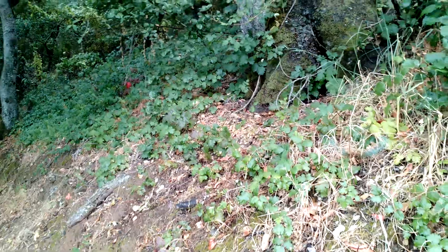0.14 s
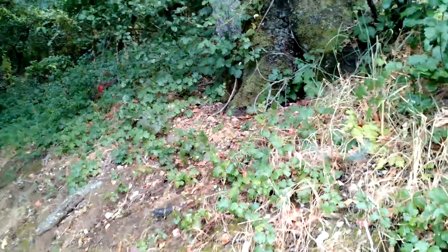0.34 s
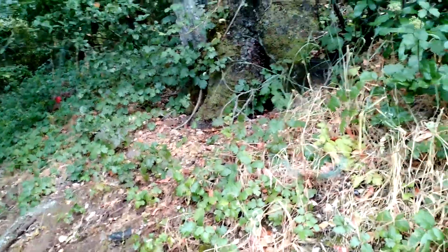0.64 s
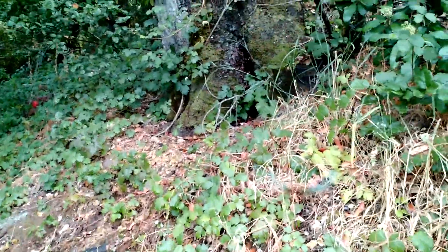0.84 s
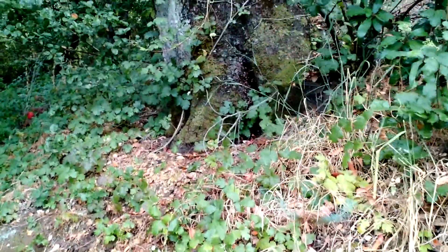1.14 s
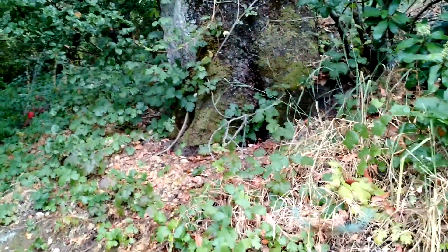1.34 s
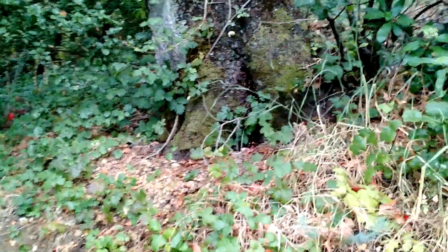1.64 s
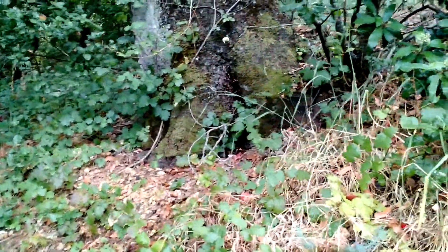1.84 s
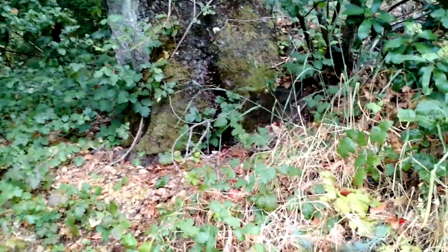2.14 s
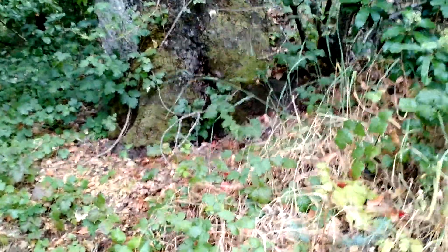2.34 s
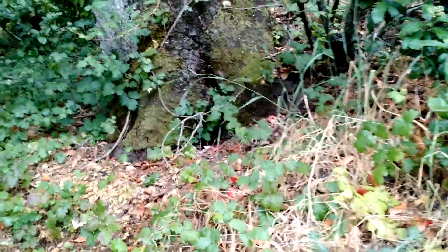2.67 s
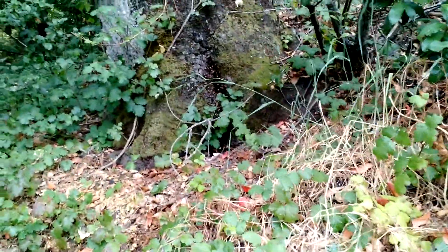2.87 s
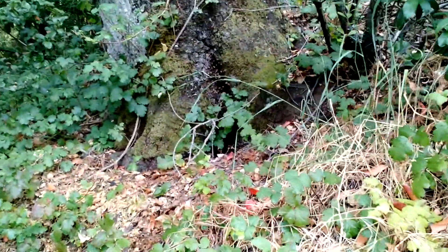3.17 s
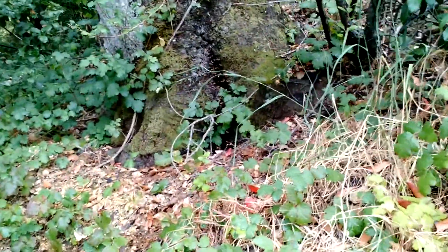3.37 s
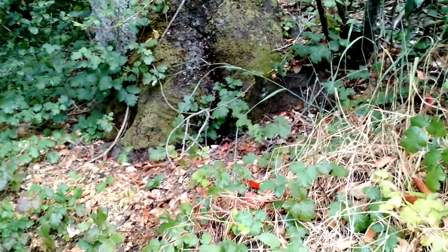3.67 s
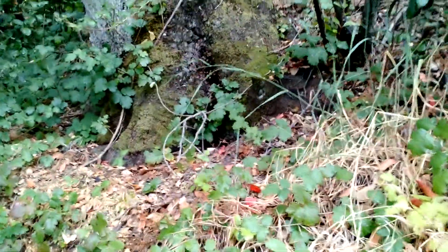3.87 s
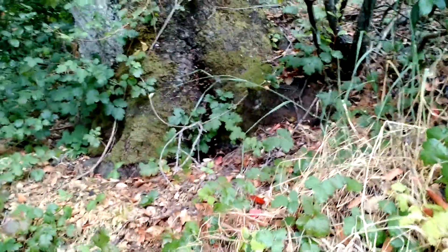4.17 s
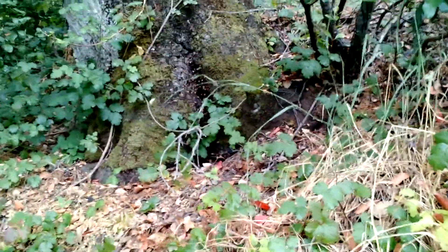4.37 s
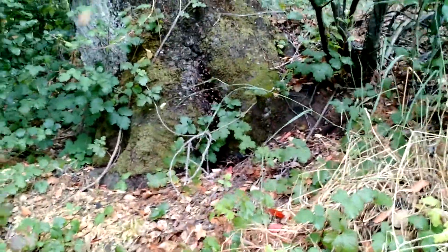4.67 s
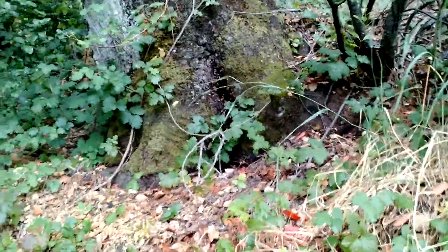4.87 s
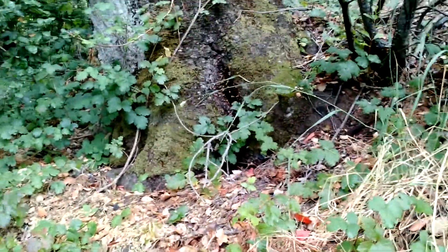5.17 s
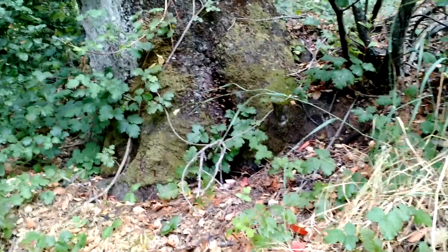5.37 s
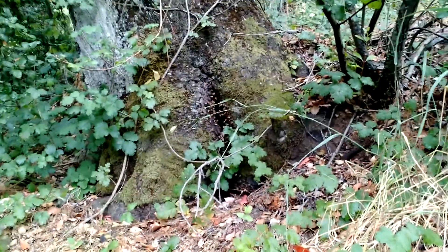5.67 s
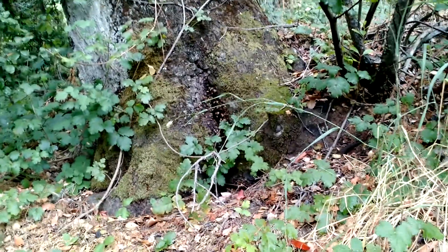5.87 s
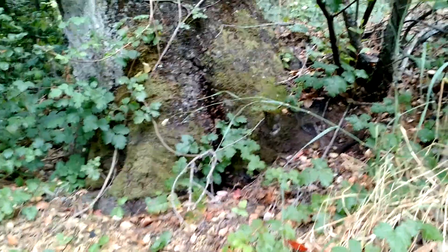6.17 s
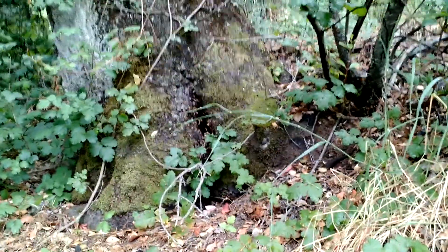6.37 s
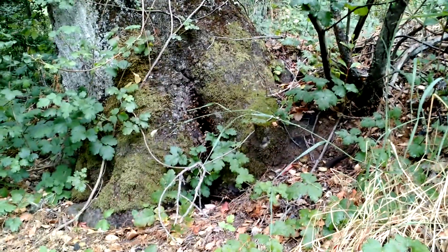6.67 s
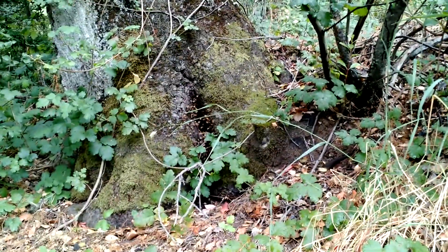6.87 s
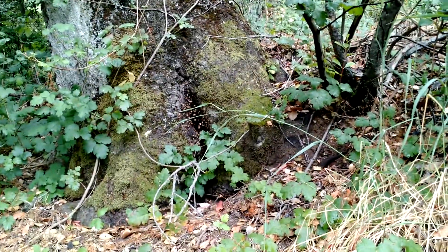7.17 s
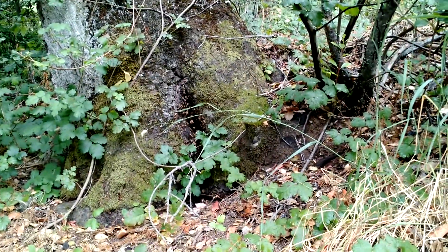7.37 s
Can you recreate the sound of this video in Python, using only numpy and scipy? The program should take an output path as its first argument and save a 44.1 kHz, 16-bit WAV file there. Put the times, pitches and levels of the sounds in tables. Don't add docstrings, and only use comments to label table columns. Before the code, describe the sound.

Quiet outdoor stereo ambience, close handheld microphone: a steady swarm buzz, leaf hiss, gentle wind buffeting and far low rumble. A low mechanical hum ends early, and scattered dry twig ticks follow. Past the middle, quick wing beats flutter nearby on the left, brush crackles and rustles sharply, and a bird gives a rough cry followed by a rapid trill. The brush settles and the bees buzz on.

```python
import sys
import numpy as np
from scipy import signal
from scipy.fft import rfft, irfft, next_fast_len
from scipy.io import wavfile
from scipy.ndimage import uniform_filter1d, map_coordinates

SR = 44100
rng = np.random.default_rng(int(sys.argv[2]) if len(sys.argv) > 2 else 0)


def wrap_up_sound(samples):
    columns = np.atleast_2d(samples).T
    tamed = np.clip(columns, -1, 1)
    steps = np.round(tamed * 32767).astype(np.int16)
    wavfile.write(sys.argv[1], SR, steps)


def convert_level_to_amplitude(level_db):
    exponent = np.asarray(level_db, float) / 20
    return 10 ** exponent


N = 331191
T = np.arange(N) / SR

# f/Hz, level/dB per Hz
WIND_SPECTRUM = [(2, -8), (7, 0), (13, -2), (22, -8), (34, -15), (50, -23), (90, -31), (200, -44),
                 (500, -62)]
# t/s, rise/dB, half length/s
GUSTS = [
    (0, 4, .6),
    (2, 2, .5),
    (3.7, 5, .45),
    (5.5, 5.5, .6),
    (7.5, -5, .5),
]
# f/Hz, level/dB per Hz
RUMBLE_SPECTRUM = [(22, -3), (40, -3.5), (65, 2.5), (100, -4.5), (130, -13), (300, -17.5), (700, -46)]
# f/Hz, likeness of the ports
RUMBLE_LIKENESS = [(40, .985), (200, .985)]
# t/s, rise/dB, half length/s
RUMBLE_SWELLS = [
    (.3, 5, 0.52),
    (3.6, 2.5, .25),
    (4.75, 2.5, .35),
    (5.45, 4, .15),
    (6.35, 5, 0.56),
]
# f/Hz, level/dB per Hz
LEAF_SPECTRUM = [(120, 19), (330, 8.5), (620, 4), (1100, 10), (1500, 4), (2200, 3), (3000, 3.5),
                 (5000, 3.5), (8000, 0.5), (12000, -2.5), (15500, -8.5)]
# f/Hz, left minus right/dB
LEAF_LEAN = [(100, -8), (1000, -1), (3000, -3.5), (6000, -5), (10000, -6), (15000, -7)]
# f/Hz, likeness of the ports
PORT_LIKENESS = [(60, 0.99), (250, 1), (600, 0.56), (1500, 0.4), (2500, .3), (5000, 0.05), (12000, 0.017)]
# peak t/s, rise/dB, build/s, settle/s
BRUSH_SWAY = (5.82, 6.2, 0.24, 0.31)
# t/s, level/dB, f/Hz, thud/dB, half of left minus right/dB
TWIG_TICKS = [
    (1.946, -44.5, 4330, -18, 0),
    (3.7992, -37, 6600, -20, -5),
    (3.904, -44, 6000, -3, 1),
    (4.066, -45, 3180, -12, 4),
    (5.3177, -36.5, 5600, -14, 5),
    (5.603, -44, 3430, -7, 3),
    (5.8485, -29, 3650, -8, 3),
    (7.4964, -48, 3680, -5, -2),
]
# t/s, level/dB, half length/s, low minus high feathers/dB
WING_BEATS = [
    (3.9, -56, .04, 4),
    (5.645, -52, .015, -12),
    (5.271, -52.5, 0.015, 11),
    (5.298, -42.5, .01, 6.5),
    (5.397, -42, .011, -7),
    (5.492, -50.5, 0.019, -3),
    (5.602, -53, 0.0043, -11),
    (6.079, -49.5, 0.027, -8),
]
# f/Hz, level/dB per Hz
LOW_FEATHER_SPECTRUM = [(200, -10), (600, -6.5), (1350, 1), (1800, -3.5), (2300, -15), (4000, -11),
                        (9000, -7), (15500, -36)]
# f/Hz, level/dB per Hz
HIGH_FEATHER_SPECTRUM = [(1500, -48), (2600, -7), (3200, 2), (3900, -5), (7000, -8), (10000, -11.5),
                         (15500, -24)]
# f/Hz, left minus right/dB
BIRD_LEAN = [(300, 38), (2500, 17), (3800, 12), (5000, 6), (9000, 4), (15000, 2)]
# start t/s, stop t/s, low level/dB, high minus low/dB
LAST_SHAKE = (6.058, 6.104, -42.5, -2.5)
# multiple of wing rate, level/dB
WING_HARMONICS = [(1, 0.5), (2, 0.5), (3, -10.5), (4, -19.5), (5, -14.5), (6, -18)]
# t/s, level/dB
SWARM_LEVEL = [(0, -57), (.2, -51), (.75, -55.5), (2.6, -54.5), (3.0, -53), (3.6, -54), (4.06, -50.5),
               (4.4, -54), (4.75, -50), (5.2, -53), (5.95, -49.5), (6.6, -54), (7.15, -51), (7.51, -53.5)]
# t/s, half length/s, f/Hz, glide/Hz per s, level/dB
BEE_PASSES = [(.12, .07, 95, 60, -52), (.38, .14, 101, -10, -52), (.38, .08, 263, -0.5, -55),
              (.72, 0.077, 267.4, -60, -57), (.95, 0.049, 260, 0, -58.5), (1.1, 0.062, 267, 0.5, -57.5),
              (3.73, .04, 238, 0, -55.5), (3.87, .04, 236, 0, -55), (3.96, .06, 260, 0, -54),
              (4.22, .14, 247, 55, -56), (4.43, 0.051, 242.2, -2, -56.5), (4.8, .05, 245, 0, -58),
              (5.98, .06, 261.8, 60.5, -54), (6.17, .06, 252, -19, -52.5), (6.32, 0.048, 245.5, 0, -56),
              (6.5, .06, 254.8, 30.5, -56), (7.25, .1, 238, 0, -58)]
# f/Hz, share crossed over
CROSS_SHARE = [(20, 0.73), (150, 0.8), (1300, 0.96), (2650, 0.76), (4000, 0.31), (5500, 0.39), (8500, 0.24),
               (15000, 0.18)]


def unit(x):
    return x / np.sqrt(np.mean(x ** 2) + 1e-20)


def along(points, hz):
    f, v = np.transpose(points)
    return np.interp(np.log(hz + 1), np.log(f + 1), v)


def wobble(rate_hz, count=1, step=1):
    at = np.arange(0, N, step) * rate_hz / SR
    knots = rng.standard_normal((count, 200))
    return np.array([map_coordinates(k, [at], mode="wrap") for k in knots])


def swells(rows):
    return sum(db * np.exp(-.5 * ((T - s) / half) ** 2) for s, db, half in rows)


def between(start_s, stop_s, fade_s=.012):
    return np.clip(np.minimum(T - start_s, stop_s - T) / fade_s, 0, 1)


def filtered(x, response):
    m = next_fast_len(N + 8192)
    return irfft(rfft(x, m) * response(np.fft.rfftfreq(m, 1 / SR)), m)[..., :N]


def rush(spectrum, lean, alike=PORT_LIKENESS):
    m = next_fast_len(N + 8192)
    hz = np.fft.rfftfreq(m, 1 / SR)
    turn = np.arccos(np.clip(along(alike, hz), 0, 1)) / 2
    noise = rfft(rng.standard_normal((2, N)), m) * convert_level_to_amplitude(along(spectrum, hz))
    mid, side = noise * [np.cos(turn), np.sin(turn)]
    lean_gain = convert_level_to_amplitude(np.outer([.5, -.5], along(lean, hz)))
    return unit(irfft([mid + side, mid - side] * lean_gain, m)[:, :N])


def wind():
    level_db = -46.5 + swells(GUSTS) + 2.2 * wobble(6, count=2)
    return convert_level_to_amplitude(level_db) * rush(WIND_SPECTRUM, [(30, .8)], alike=[(30, .1)])


def far_rumble():
    level_db = -45 + swells(RUMBLE_SWELLS) + 0.71 * wobble(3.01)
    return convert_level_to_amplitude(level_db) * rush(RUMBLE_SPECTRUM, [(40, 1.4), (200, 3.0)], alike=RUMBLE_LIKENESS)


def leaf_hiss(swarm_db):
    gain_db_per_s, follow_share = 0.2962, 0.18
    peak_s, rise_db, build_s, settle_s = BRUSH_SWAY
    sway_db = rise_db * np.exp(-np.abs(T - peak_s) / np.where(T < peak_s, build_s, settle_s))
    level_db = -50.5 + gain_db_per_s * T + follow_share * (swarm_db - swarm_db.mean()) + sway_db
    return convert_level_to_amplitude(level_db + 0.78 * wobble(20.98)) * rush(LEAF_SPECTRUM, LEAF_LEAN)


def lens_motor():
    early_db, ease_s, stop_s, motor_hz = 2.3, .55, 1.385, 46.87
    level_db = -43.8 + early_db * np.clip((ease_s - T) / .2 + .5, 0, 1)
    shake = np.sqrt(2) * np.sin(2 * np.pi * motor_hz * T)
    return between(0, stop_s) * convert_level_to_amplitude(level_db) * shake * np.array([[1.99], [-0.01]])


def twigs():
    out = np.zeros((2, N + SR))
    t = np.arange(SR // 40) / SR
    attack_s, decay_60db_s = .0012, .011
    fall = convert_level_to_amplitude(-60 * t / decay_60db_s) * (1 - np.exp(-t / attack_s)) ** 2 * 3
    for s, db, hz, thud_db, pan_db in TWIG_TICKS:
        grit = rng.standard_normal((3, len(t)))
        crack = np.cos(2 * np.pi * hz * t) * uniform_filter1d(grit[:2], size=8) * 2.95
        thud = convert_level_to_amplitude(thud_db + 11) * uniform_filter1d(grit[2], size=20)
        gain = convert_level_to_amplitude(db + 6.5 + np.array([[pan_db], [-pan_db]]))
        start = round((s - attack_s) * SR)
        out[:, start:start + len(t)] += gain * fall * (crack + thud)
    return out[:, :N]


def feathers():
    peak_s, rise_db_per_s, fall_db_per_s = 5.858, 79, 47
    rustle_grit_db, beat_grit_db = 1.5, 2.5
    slope = np.where(T < peak_s, rise_db_per_s, fall_db_per_s)
    rustle = between(5.66, 6.06, 0.047) * convert_level_to_amplitude(-39 - slope * np.abs(T - peak_s))
    start_s, stop_s, shake_db, shake_high_db = LAST_SHAKE
    shake = between(start_s, stop_s) * convert_level_to_amplitude(shake_db)
    low_db = 1.0 + 1.9 * wobble(25) + rustle_grit_db * wobble(180)
    high_db = 1.0 * wobble(24) + rustle_grit_db * wobble(300)
    low = shake + rustle * convert_level_to_amplitude(low_db)
    high = shake * convert_level_to_amplitude(shake_high_db) + rustle * convert_level_to_amplitude(high_db)
    grain = convert_level_to_amplitude(beat_grit_db * wobble(250)[0])
    for s, db, half_s, tilt_db in WING_BEATS:
        puff = convert_level_to_amplitude(db) * grain * np.exp(-.5 * ((T - s) / half_s) ** 2)
        low = low + puff * convert_level_to_amplitude(tilt_db / 2)
        high = high + puff * convert_level_to_amplitude(-tilt_db / 2)
    close = [(300, 0.93), (2500, 0.64), (8000, 0.15)]
    low_air = rush(LOW_FEATHER_SPECTRUM, BIRD_LEAN, close)
    high_air = rush(HIGH_FEATHER_SPECTRUM, BIRD_LEAN, close)
    return low * low_air + high * high_air


def throat_carrier(hz):
    return np.sqrt(2) * np.cos(2 * np.pi * np.cumsum(hz) / SR)


def throat_rasp(age_s):
    throat_hz = 4276 + 1447 * (1 - np.exp(-age_s / .2)) - 650 * age_s
    narrow_until_s, widen_s, close_per_s = 5.72, 0.087, .45
    opening = np.minimum((T - narrow_until_s) / widen_s, 1)
    closing = close_per_s * np.clip(T - narrow_until_s - widen_s, 0, None)
    share = np.clip(opening - closing, 0, 1)
    narrow = rush([(60, 0), (250, 0.0), (700, -7), (1500, -15), (4000, -65)], [(99, -2)], alike=[(99, 0.24)])
    broad = rush([(60, -1), (800, -2.5), (1400, -5.5), (2200, -12), (5000, -57)], [(99, -3.0)],
                 alike=[(99, 0.1)])
    return (np.sqrt(1 - share) * narrow + np.sqrt(share) * broad) * throat_carrier(throat_hz)


def call():
    start_s, stop_s, sag_db_per_s, release_s = 5.615, 6.55, 8, .075
    trill_start_s, note_step_s, note_count, note_s = 6.018, .0635, 9, .033
    trill_peak_s, trill_half_s, whistle_s = 6.35, 0.36, .034
    age_s = np.clip(T - start_s, 0, None)
    cry_db = swells([(5.66, 7.5, .032)])
    level_db = -38 - sag_db_per_s * age_s + cry_db
    release = np.exp(-np.clip(T - stop_s, 0, None) / release_s)
    level = np.clip(age_s / .022, 0, 1) ** 2 * release * convert_level_to_amplitude(level_db)
    rasp = throat_rasp(age_s)
    reed_hz = 4250 + 2500 * np.clip(T - trill_peak_s, 0, 1)
    reed_noise = rush([(60, -1), (400, -1), (900, -11), (3000, -60)], [(99, -2)], alike=[(99, 0.2)])
    reed = reed_noise * throat_carrier(reed_hz)
    kick, whistle, notes = np.full(N, .6), np.zeros(N), np.zeros(N)
    for s in trill_start_s + note_step_s * np.arange(note_count):
        bow = ((s - trill_peak_s) / trill_half_s) ** 2
        note_db = 1.5 * rng.standard_normal() - 3 * bow
        note = convert_level_to_amplitude(note_db) * between(s - .004, s + note_s - .004, .008)
        kick = kick + convert_level_to_amplitude(-8) * note
        notes = notes + convert_level_to_amplitude(-51) * note
        u = np.clip(T - s + .011, 0, whistle_s)
        rise = 2 * np.pi * (1850 * u + 25000 * u ** 2)
        whistle = whistle + convert_level_to_amplitude(-54.5 - 7 * bow) * np.sin(np.pi * u / whistle_s) * np.sin(rise)
    return level * kick * rasp + notes * reed + whistle * convert_level_to_amplitude([[-3], [1.5]])


def flybys():
    first_db, waver_hz = -5, 3 * wobble(12)[0]
    out = np.zeros(N)
    for s, half_s, hz, glide_hz_per_s, db in BEE_PASSES:
        near = np.abs(T - s) < 3 * half_s
        u = T[near] - s
        turn = 2 * np.pi * np.cumsum(hz + glide_hz_per_s * u + waver_hz[near]) / SR
        tone = sum(convert_level_to_amplitude(level + first_db * (k == 1)) * np.sin(k * turn + k * k) for k, level in WING_HARMONICS)
        out[near] += convert_level_to_amplitude(db) * np.exp(-.5 * (u / half_s) ** 2) * tone
    return out * convert_level_to_amplitude([[1.0], [-1.0]])


def swarm(level_db, count=44, step=10):
    habit = np.linspace(-1, 1, count)[:, None]
    drift = .2 * wobble(2.5, count, step) + .06 * wobble(14, count, step)
    effort = .6 * habit + .4 * habit ** 3 + drift
    hz = 241 + 43 * effort - 7 * effort ** 2
    turn = 2 * np.pi * np.cumsum(hz, axis=1) * step / SR
    side = rng.standard_normal((count, 1)) + 0.48 * wobble(1.48, count, step)
    lead = 2 * np.pi * hz * side * 5.5e-5
    near_db = 4.6 * wobble(4.5, count, step) - 11 * np.clip(effort - .65, 0, 2)
    pair = []
    for way in (1, -1):
        phase = turn + way * lead
        tone = sum(convert_level_to_amplitude(db) * np.sin(k * phase + k * k) for k, db in WING_HARMONICS)
        gain = convert_level_to_amplitude(near_db + way * (0.4 * side + 1.0))
        pair.append(np.sum(tone * gain, axis=0))
    return convert_level_to_amplitude(level_db) * unit(signal.resample_poly(pair, step, 1, axis=1)[:, :N])


def scene():
    swarm_db = np.interp(T, *np.transpose(SWARM_LEVEL))
    background = wind() + far_rumble() + leaf_hiss(swarm_db) + lens_motor() + twigs()
    bird = feathers() + call()
    bees = flybys() + swarm(swarm_db + 2.0)
    return background + bird + bees


def band_limit(x):
    return signal.sosfilt(signal.butter(12, 16310, fs=SR, output="sos"), x)


def record(dry):
    def cross_response(hz):
        cycles = hz / 2980 + 0.19 * np.tanh(hz / 3100)
        return along(CROSS_SHARE, hz) * np.exp(-2j * np.pi * cycles)

    crossed = filtered(dry[::-1], cross_response)
    wide = (dry - crossed) * convert_level_to_amplitude(-2.5)
    wide = wide * np.clip(0.15 + T / 0.11, 0, 1)
    mix = filtered(wide, lambda hz: hz < 15510)
    return band_limit(mix)


dry = scene()
out = record(dry)
wrap_up_sound(out)
```